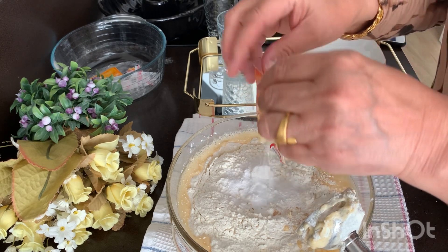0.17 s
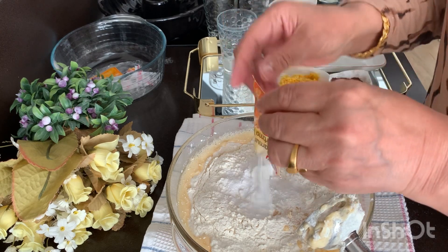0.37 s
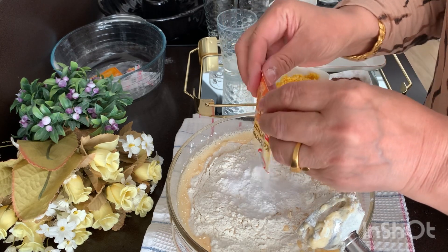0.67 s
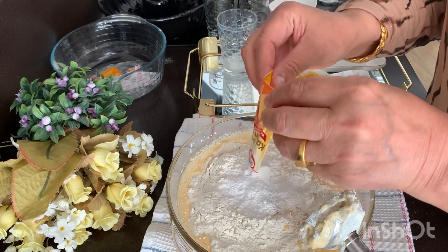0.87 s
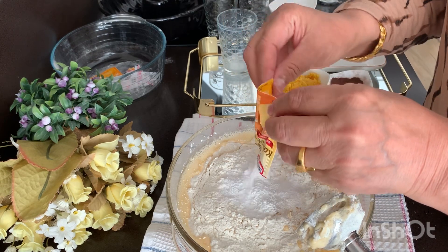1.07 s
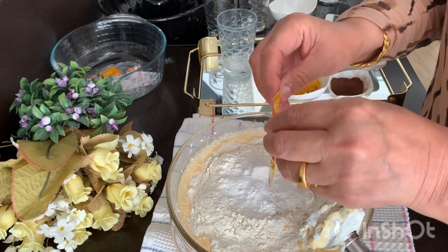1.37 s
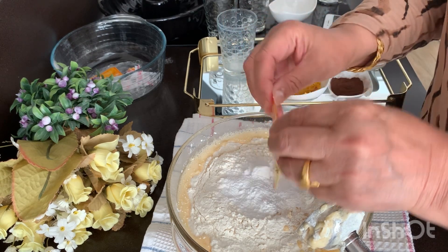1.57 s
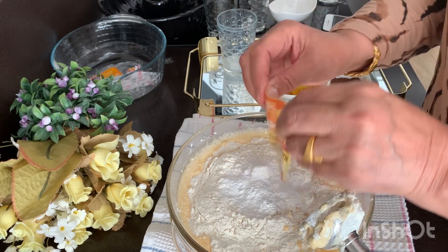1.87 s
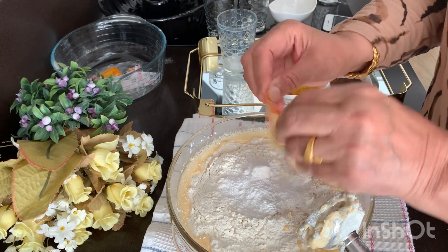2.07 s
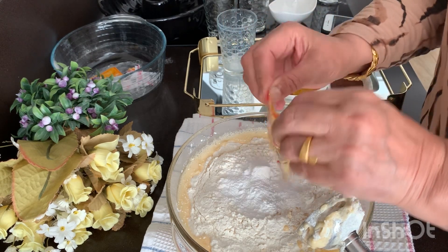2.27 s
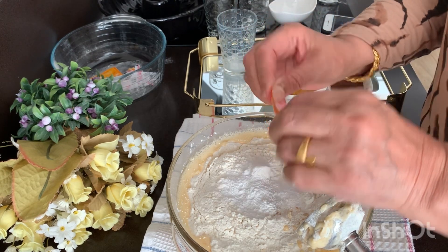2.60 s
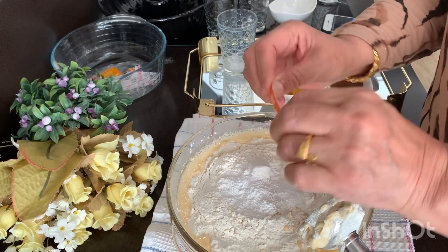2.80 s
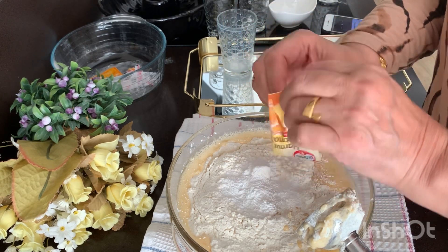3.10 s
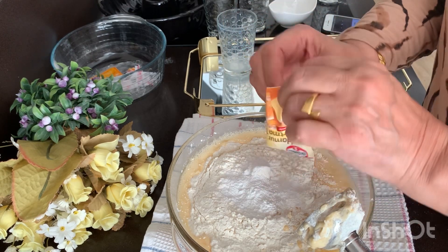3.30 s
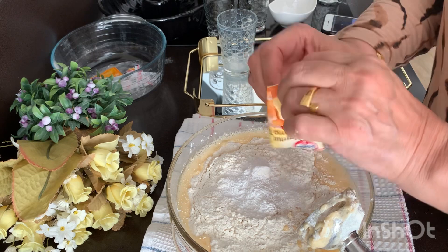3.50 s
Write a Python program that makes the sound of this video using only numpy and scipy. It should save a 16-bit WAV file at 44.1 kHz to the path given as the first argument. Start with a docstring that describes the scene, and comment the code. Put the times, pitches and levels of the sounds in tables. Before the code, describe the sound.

Small paper sachet crinkling and being flicked quickly over a bowl, above a low kitchen hum

```python
"""A low hum in a quiet kitchen, slowly swelling; over it a small paper sachet is squeezed, then flicked
about five times a second over a bowl. Each crease that buckles is a short swelling cluster of tiny snaps
that rings the resonances of the paper pouch. Sparse random cracks make a fine rustle in between, soft
finger pushes ring the pouch's hollow and low thumps, and dense noise echoes make the kitchen."""
import sys
import numpy as np
from scipy import signal
from scipy.fft import rfft, irfft
from scipy.io import wavfile
from scipy.ndimage import uniform_filter1d

SR = 44100
rng = np.random.default_rng(int(sys.argv[2]) if len(sys.argv) > 2 else 0)


def file_out(sig):
    """Save sig as 16-bit WAV at sys.argv[1]."""
    # one column per channel
    cols = np.atleast_2d(sig).T
    # limit, then scale
    lim = np.clip(cols, -1, 1)
    pcm = np.round(lim * 32767).astype(np.int16)
    wavfile.write(sys.argv[1], SR, pcm)


def to_linear_factor(level_db):
    """Convert decibel levels (scalar or array-like) to linear amplitude factors."""
    exponent = np.asarray(level_db, float) / 20
    return 10 ** exponent


N = 160965   # samples

# spectrum of the hum, relative: pitch_hz, level_db (per Hz)
HUM_SPECTRUM = [(25, -31), (48, -4), (75, -7.5), (109, -1), (200, -6.5), (280, -14), (410, -9.5),
                (600, -23), (3300, -34), (10500, -38.5), (12000, -51)]
# creases that buckle: start_s, length_s, middle_db, treble_db (drive levels)
CREASES = [(0.1322, 0.0041, -39.5, -35.5), (0.415, 0.01, -48, -58), (0.592, 0.025, -58, -54.5),
           (0.6286, 0.01, -34.5, -39), (0.7456, 0.0043, -43.5, -49.5), (0.816, 0.0022, -36, -41),
           (0.828, 0.0092, -38, -54), (0.843, 0.0039, -32, -35), (0.852, 0.013, -34.5, -43),
           (0.9374, 0.012, -45.5, -38), (1.0186, 0.0028, -32, -26), (1.1477, 0.002, -39.5, -40.5),
           (1.236, 0.0055, -43, -74), (1.282, 0.0024, -42, -34.5), (1.325, 0.0069, -44.5, -75),
           (1.369, 0.0046, -39.5, -82), (1.4282, 0.006, -33, -33), (1.473, 0.0016, -28, -28.5),
           (1.522, 0.0017, -34.5, -34), (1.5823, 0.0044, -32, -28), (1.599, 0.019, -35, -54),
           (1.6963, 0.0017, -37.5, -32), (1.712, 0.0049, -36.5, -34.5), (1.732, 0.0013, -68, -31),
           (1.7864, 0.0079, -36.5, -37), (1.8503, 0.00091, -38, -35.5), (1.878, 0.013, -36, -27),
           (1.91, 0.0029, -39, -30.5), (1.957, 0.0014, -26.5, -28), (2.0215, 0.0006, -30, -20),
           (2.033, 0.0033, -47, -40), (2.062, 0.0084, -36, -33), (2.0893, 0.0068, -27.5, -25),
           (2.131, 0.00054, -44, -28), (2.153, 0.00082, -34.5, -28.5), (2.206, 0.007, -32.5, -30.5),
           (2.2173, 0.013, -34, -28), (2.2782, 0.0098, -36.5, -24.5), (2.295, 0.018, -29, -24),
           (2.32, 0.0024, -50, -34), (2.406, 0.0097, -31, -31), (2.461, 0.02, -35.5, -44),
           (2.4823, 0.0019, -29.5, -31.5), (2.505, 0.00053, -54, -24.5), (2.6, 0.0014, -44.5, -53),
           (2.6051, 0.021, -34, -31), (2.657, 0.0033, -31, -29.5), (2.6715, 0.0071, -31.5, -32),
           (2.695, 0.0018, -57, -29.5), (2.789, 0.001, -38.5, -42), (2.802, 0.013, -30, -28.5),
           (2.843, 0.016, -39, -33.5), (2.8618, 0.012, -26.5, -25), (2.8815, 0.0018, -52, -26),
           (2.933, 0.0051, -42, -33.5), (2.996, 0.0097, -26.5, -30.5), (3.043, 0.013, -32.5, -30.5),
           (3.065, 0.0041, -32.5, -27.5), (3.109, 0.0042, -36, -33), (3.192, 0.036, -36.5, -42),
           (3.2008, 0.01, -30, -25.5), (3.2487, 0.0024, -30, -21), (3.2552, 0.026, -37.5, -31),
           (3.311, 0.014, -39.5, -34), (3.3468, 0.00096, -32, -30), (3.395, 0.0034, -26, -45),
           (3.402, 0.0096, -28, -29), (3.447, 0.013, -28, -23), (3.4764, 0.00071, -28.5, -26)]
# resonances of the paper pouch: pitch_hz, width_hz, level_db (relative within its band)
POUCH_MODES = [(605, 20, 3), (1389, 1460, 13.5), (2031, 42, 9), (3684, 113, 6), (8300, 900, 5.5),
               (8930, 640, 39)]
# rustle as the fingers work the paper: time_s, level_db
HANDLING = [(0, -100), (.58, -77.5), (.8, -62.5), (1.33, -63), (2.1, -54), (3.65, -59)]
# colour of that rustle, added to its level: low_db, middle_db, treble_db
RUSTLE_COLOUR = (0, 2.55, -6.5)
# finger knocks: start_s, hollow_db (ring of the pouch's hollow), thump_db (low thump)
FLICKS = [(0.412, -37.5, -61), (0.634, -27.5, -59), (1.884, -33.5, -33), (2.025, -23.5, -56),
          (2.414, -45, -33.5), (2.623, -33, -30), (2.815, -38, -29), (3.004, -19, -32.5), (3.208, -17, -30),
          (3.406, -25, -32.5)]
# low modes of the thump: pitch_hz, level_db (added to thump_db), t60_s
THUMP_MODES = [(108, -1, .13), (200, 4, .05), (380, 5, .03)]
# tone of the microphone: pitch_hz, level_db
MIC_TONE = [(750, -8), (2000, -6), (3200, 1.5), (10500, -8), (11600, -22.5), (12600, -4.5), (15700, -22),
            (16000, -55)]
# balance of the sachet and its echoes: pitch_hz, left_minus_right_db
LEAN = [(200, 0), (350, -4), (800, 2.5), (4400, -1), (8000, 0)]

HUM_START_DB, HUM_SWELL_DB_PER_S, HUM_WAVER_DB = -56.5, 1.66, 1.5
ALIKE_BELOW_HZ = 280   # the hum is much the same on both sides below this
BAND_EDGES_HZ = [420, 1200, 6000, 17000]   # low, middle and treble of the paper
BROAD_DB, MODE_SCATTER_DB = 3, 2.5   # broad snap beside the modes; chance in each mode's strength
FOLD_S, FOLD_SHIFT = 0.03, 0.06   # a new pouch shape is drawn this often; largest share modes move by
SNAPS_PER_S, SNAP_SPREAD_DB = 10000, 2.7
RISE_SHARE, FADE_S, BODY_DB = 0.29, 0.002, -15.5   # share of length_s; low band against the middle
CRACKS_PER_S, CRACK_S, CRACK_SPREAD_DB = 220, 0.0008, 3.2
SETTLE_DB, SETTLE_S = -9, 0.023   # the paper goes on crackling after each crease
HOLLOW_HZ, HOLLOW_T60_S, FINGER_S = 592, 0.079, 0.0011
KITCHEN_T60_S, KITCHEN_DB, WALL_CUT_HZ = 0.3, -12, 4500
NEAR_DB, NEAR_S = -4, 0.001   # echoes off hands, bowl and table
LEFT_LAG_S = 0.00012


def rms_one(x):
    """Scale to rms 1."""
    return x / np.sqrt(np.mean(x ** 2) + 1e-20)


def at_hz(points, hz):
    """Read a spectrum table on a log-frequency axis."""
    p = np.array(points, float)
    return np.interp(np.log(np.maximum(hz, 1)), np.log(p[:, 0]), p[:, 1])


def drift(rate_hz):
    """Slow chance of rms 1: noise through a double one-pole lowpass, its first second dropped."""
    r = np.exp(-2 * np.pi * rate_hz / SR)
    slow = signal.lfilter([1], [1, -2 * r, r * r], rng.standard_normal(N + SR))
    return rms_one(slow[SR:])


def hum():
    """Noise shaped to a low hum that swells and wavers, alike on both sides only in the bass."""
    hz = np.fft.rfftfreq(N, 1 / SR)
    alike = 1 / (1 + (hz / ALIKE_BELOW_HZ) ** 4)
    mid, side = rfft(rng.standard_normal((2, N))) * to_linear_factor(at_hz(HUM_SPECTRUM, hz))
    left_right = np.sqrt(1 + alike) * mid + np.sqrt(1 - alike) * side * [[1], [-1]]
    swell_db = HUM_START_DB + HUM_SWELL_DB_PER_S * np.arange(N) / SR
    return to_linear_factor(swell_db + HUM_WAVER_DB * drift(3.5)) * rms_one(irfft(left_right, N))


def grains(per_s, spread_db):
    """Random clicks of very uneven size and either sign, rms 1."""
    sizes = to_linear_factor(spread_db * np.minimum(rng.exponential(1, N), 4)) * rng.choice([-1, 1], N)
    happens = rng.random(N) < per_s / SR
    return rms_one(sizes * happens + 1e-18)


def resonate(x, hz, width_hz):
    """Two-pole resonance that keeps the power of white noise."""
    r = np.exp(-np.pi * width_hz / SR)
    gain = np.sqrt((1 - r * r) / 2)
    return signal.lfilter([gain, 0, -gain], [1, -2 * r * np.cos(2 * np.pi * hz / SR), r * r], x)


def folds(count):
    """Time dealt at random to a number of shapes: one on-off row for each."""
    step = int(FOLD_S * SR)
    chosen = np.repeat(rng.integers(0, count, N // step + 1), step)[:N]
    return chosen == np.arange(count)[:, None]


def pouch(excite):
    """Paper body: excite(band, scattered) drives a broad snap and, scattered, the modes of each band."""
    out = 0
    for band in range(3):
        low, high = BAND_EDGES_HZ[band:band + 2]
        sos = signal.butter(2, [low, high], "band", fs=SR, output="sos")
        broad_gain = (-1) ** band * to_linear_factor(BROAD_DB) * np.sqrt(SR / 2 / (high - low))
        out = out + broad_gain * signal.sosfilt(sos, excite(band, False))
        modes = [m for m in POUCH_MODES if low <= m[0] < high]
        power = sum(to_linear_factor(2 * db) for _, _, db in modes)
        for k, (hz, width_hz, db) in enumerate(modes):
            drive = (-1) ** k * to_linear_factor(db) / np.sqrt(power) * excite(band, True)
            # each new shape starts its own shifted resonance; the old one rings out
            for shape, shift in zip(folds(count=5), np.linspace(-FOLD_SHIFT, FOLD_SHIFT, 5)):
                out = out + resonate(drive * shape + 1e-18, hz * (1 + shift), width_hz)
    return out


def creases():
    """Each crease swells, crackles for its length and fades, striking each mode by its own strength."""
    start, length, middle, treble = np.transpose(CREASES)
    band_db = [middle + BODY_DB, middle, treble]
    t = np.arange(SR // 16) / SR
    length = length[:, None]
    swell = np.minimum(t / (RISE_SHARE * length), 1)
    shape = swell * np.exp(-np.maximum(t - length, 0) / FADE_S)
    where = (start * SR).astype(int)[:, None] + np.arange(len(t))
    snaps = grains(SNAPS_PER_S, SNAP_SPREAD_DB)

    def excite(band, scattered):
        luck_db = scattered * MODE_SCATTER_DB * rng.standard_normal(len(start))
        gain = to_linear_factor(band_db[band] + luck_db)[:, None]
        power = np.bincount(where.ravel(), ((gain * shape) ** 2).ravel(), N + SR)[:N]
        return snaps * np.sqrt(power)
    return pouch(excite)


def rustle():
    """Small cracks at random moments; they follow the handling and die down after each crease."""
    s, db = np.transpose(HANDLING)
    handled_db = np.interp(np.arange(N) / SR, s, db)
    start, length, middle, treble = np.transpose(CREASES)
    band_db = [middle + BODY_DB, middle, treble]
    ends = ((start + length) * SR).astype(int)
    shared = grains(CRACKS_PER_S, CRACK_SPREAD_DB) ** 2
    snaps = grains(SNAPS_PER_S, SNAP_SPREAD_DB)
    r = np.exp(-1 / (CRACK_S * SR))

    def excite(band, scattered):
        stirred = np.bincount(ends, to_linear_factor(2 * (band_db[band] + SETTLE_DB)), N)[:N]
        settling = signal.lfilter([1], [1, -np.exp(-2 / (SETTLE_S * SR))], stirred)
        power = to_linear_factor(2 * (handled_db + RUSTLE_COLOUR[band])) + settling
        # half the crack power is shared, half is drawn anew for each drive
        cracks = (shared + grains(CRACKS_PER_S, CRACK_SPREAD_DB) ** 2) / 2
        bursts = signal.lfilter([(1 - r) ** 2], [1, -2 * r, r * r], cracks)
        return snaps * np.sqrt(power * bursts)
    return pouch(excite)


def flicks():
    """A soft finger push rings the hollow of the pouch and the low modes as decaying sines."""
    s, hollow_db, thump_db = np.transpose(FLICKS)
    modes = [(HOLLOW_HZ, hollow_db, HOLLOW_T60_S)]
    modes += [(hz, thump_db + db, t60) for hz, db, t60 in THUMP_MODES]
    out = 0
    for hz, db, t60 in modes:
        clicks = np.full(N, 1e-18)
        clicks[(s * SR).astype(int)] = to_linear_factor(db + 2 * rng.standard_normal(len(s)))
        r, w = to_linear_factor(-60 / (t60 * SR)), 2 * np.pi * hz / SR
        out = out + signal.lfilter([0, np.sin(w)], [1, -2 * r * np.cos(w), r * r], clicks)
    out = signal.sosfilt(signal.butter(4, 85, "high", fs=SR, output="sos"), out)
    push = np.hanning(int(FINGER_S * SR) + 3)   # the soft contact rounds off the attack
    return signal.lfilter(push / push.sum(), [1], out)


def energy_at(db, echo):
    """Scale each echo response to a total energy in dB."""
    return to_linear_factor(db) * echo / np.sqrt(np.sum(echo ** 2, axis=-1, keepdims=True))


def kitchen(x):
    """Dense echoes, other ones on each side: near scatter that changes as the hands move, then a tail."""
    t = np.arange(SR // 2) / SR
    noise = rng.standard_normal((2, len(t)))
    dull = signal.sosfilt(signal.butter(1, WALL_CUT_HZ, fs=SR, output="sos"), noise)
    die = to_linear_factor(-60 * t / KITCHEN_T60_S)
    tail = dull * die + (noise - dull) * die ** 2   # the treble dies twice as fast
    tail = energy_at(KITCHEN_DB, tail * np.minimum(t / 0.004, 1))
    near = rng.standard_normal((12, 2, 512)) * np.exp(-t[:512] / NEAR_S)
    near = signal.sosfilt(signal.butter(2, 300, "high", fs=SR, output="sos"), near)
    near = energy_at(NEAR_DB, near)
    held = uniform_filter1d(folds(count=len(near)) * 1.0, size=64) * x   # one scatter at a time, crossfaded
    far_echo = signal.fftconvolve(x[None], tail, axes=1)[:, :N]
    near_echo = signal.oaconvolve(held[:, None], near, axes=2).sum(0)[:, :N]
    return far_echo + near_echo


def colour(x, db, lag_s):
    """Causal (minimum-phase) filter of a dB-per-bin curve, with a lag."""
    size = 2 * (len(db) - 1)
    cepstrum = irfft(db * np.log(10) / 20)
    cepstrum[1:size // 2] *= 2   # fold the cepstrum forward in time
    cepstrum[size // 2 + 1:] = 0
    lag = -2j * np.pi * lag_s * np.fft.rfftfreq(size, 1 / SR)
    return irfft(rfft(x, size) * np.exp(rfft(cepstrum) + lag))[:N]


def scene():
    """The sachet reaches the right side first; the kitchen answers, over the hum."""
    sachet = creases() + rustle() + flicks()
    wet = kitchen(sachet)
    hz = np.fft.rfftfreq(2 ** 18, 1 / SR)
    mic_db, lean_db = at_hz(MIC_TONE, hz), at_hz(LEAN, hz)
    left = colour(sachet + wet[0], mic_db + lean_db / 2, LEFT_LAG_S)
    right = colour(sachet + wet[1], mic_db - lean_db / 2, 0)
    return np.array([left, right]) + hum()


def top_cut(x):
    """Nothing passes above the cut-off."""
    return signal.sosfilt(signal.butter(12, 16490, fs=SR, output="sos"), x)


def record(dry):
    """Deliver the finished stereo mix."""
    return top_cut(dry)


dry = scene()
out = record(dry)
file_out(out)
```